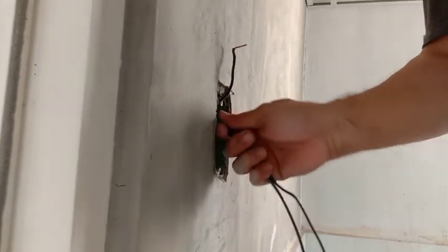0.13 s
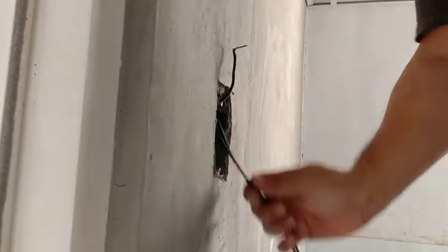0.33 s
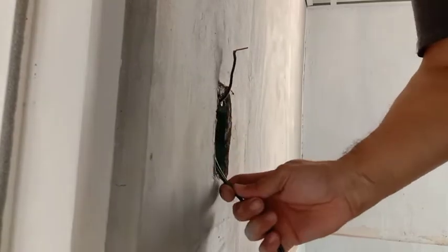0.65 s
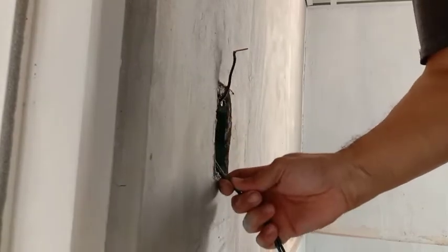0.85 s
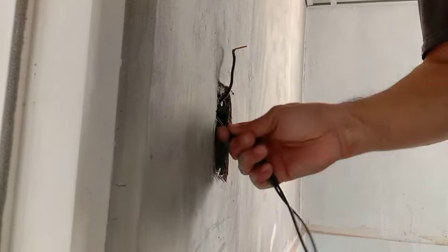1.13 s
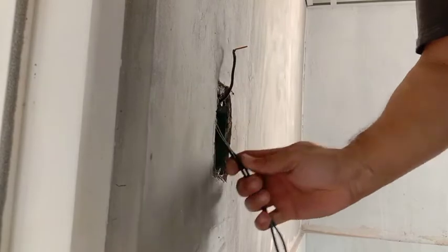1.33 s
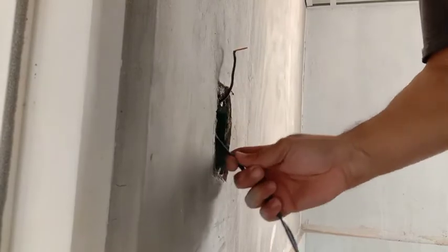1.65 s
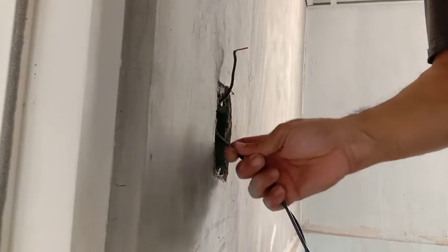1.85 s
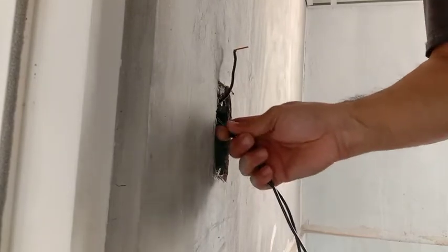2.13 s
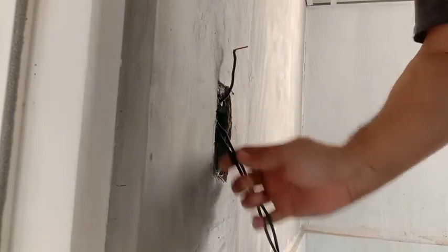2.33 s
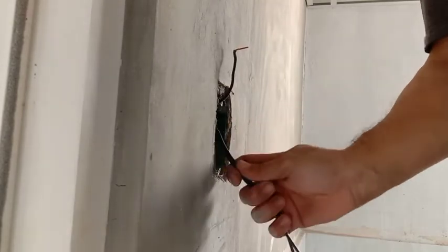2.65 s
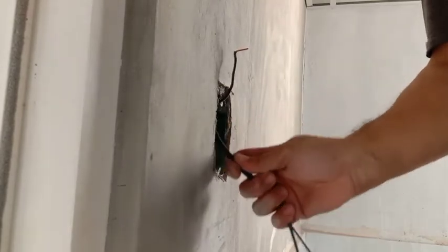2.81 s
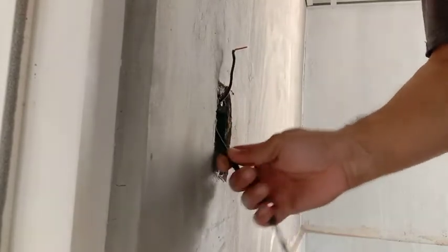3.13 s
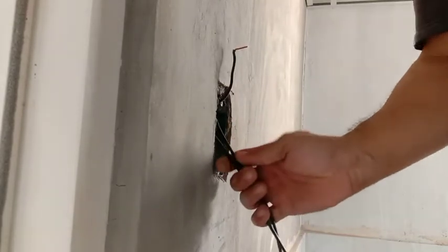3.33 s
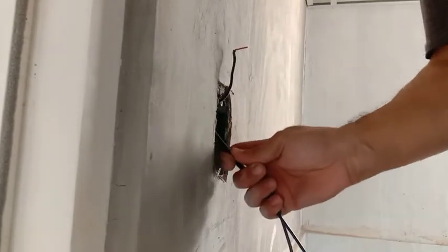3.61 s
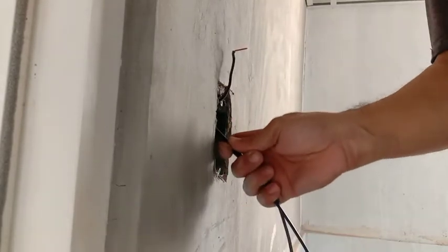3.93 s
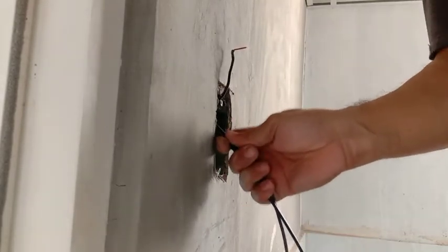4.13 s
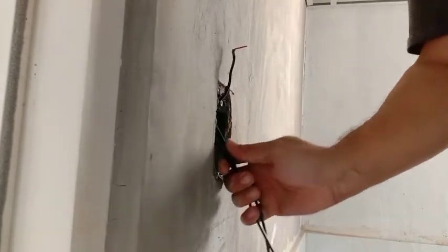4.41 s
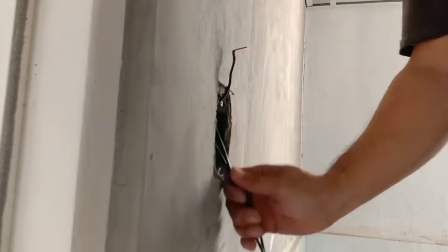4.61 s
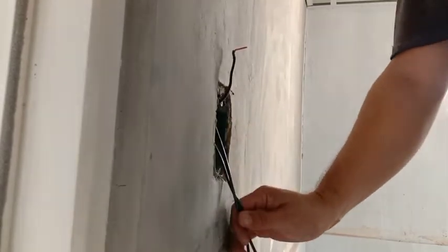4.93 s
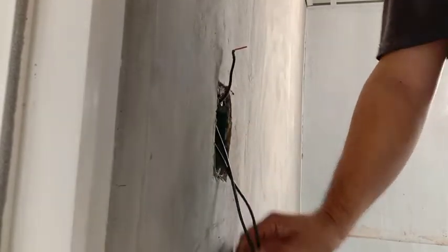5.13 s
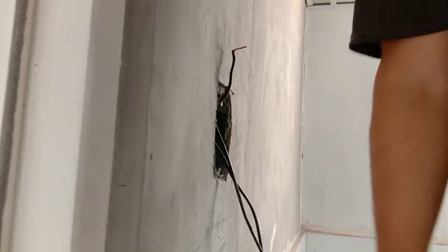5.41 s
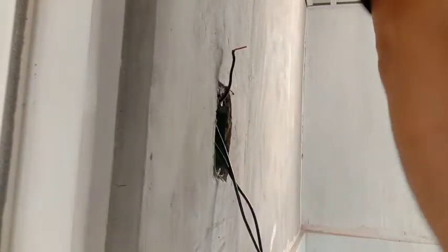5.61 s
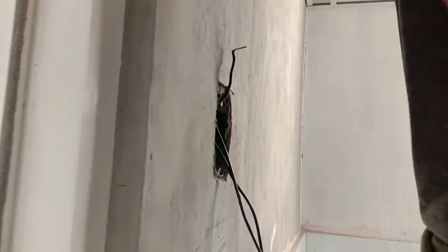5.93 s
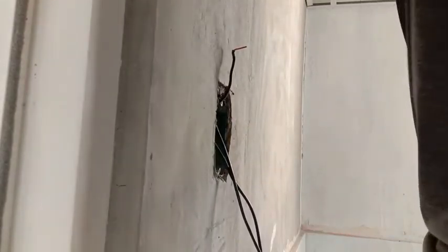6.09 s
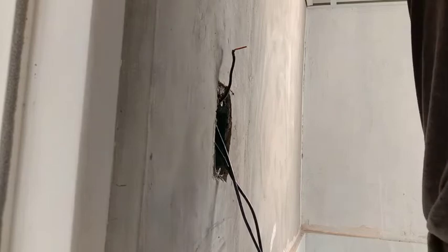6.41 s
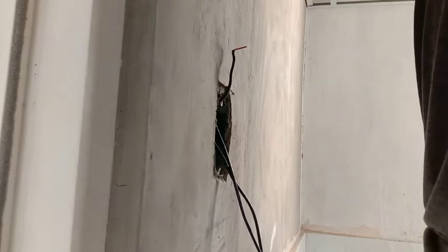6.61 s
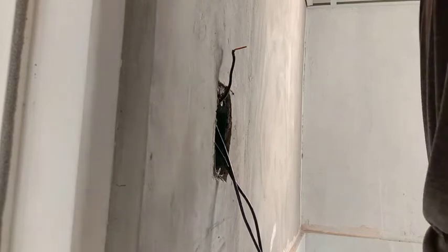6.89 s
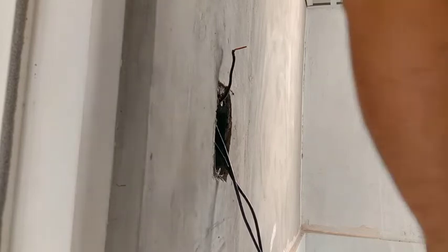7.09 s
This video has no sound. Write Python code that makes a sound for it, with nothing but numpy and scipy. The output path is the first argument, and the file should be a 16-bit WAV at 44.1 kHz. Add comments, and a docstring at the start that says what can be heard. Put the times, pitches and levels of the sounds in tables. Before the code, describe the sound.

Stiff cable knocks and rasps against a pipe edge inside a bare wall, squeaking faintly, each blow ringing out into a hollow, reverberant room.

```python
"""Faint room rumble, then at once a ringing knock: someone hammers on masonry nearby while wire is tugged
through a conduit into a wall box. Hard knocks follow about once a second, lighter clacks between: noise through
wall modes, plus a crash. Between them insulation scrapes the pipe (band noise shaped by strokes) and squeaks
(smeared tones). Behind lie coloured-noise air, a low drone, arm rustle and booming thuds in a bare, echoing
room."""
import sys
import numpy as np
from scipy import signal
from scipy.fft import rfft, irfft, next_fast_len
from scipy.io import wavfile
from scipy.ndimage import map_coordinates

SR = 44100
rng = np.random.default_rng(int(sys.argv[2]) if len(sys.argv) > 2 else 0)


def pcm_store(signal):
    """Save signal as 16-bit PCM."""
    levels = np.round(np.clip(np.atleast_2d(signal), -1, 1) * 32767)
    wavfile.write(sys.argv[1], SR, levels.astype(np.int16).T)


N = 319989

# blows: t/s, level/dB, slope below lower note/(dB/octave), treble slope/(dB/octave), mid dip/dB,
# pitched power share/1, rattle/s, lower note f/Hz, upper note f/Hz
BLOWS = [(0.090, -42, -7.5, -17.5, -3.5, 0.57, 0.047, 790, 960),
         (0.655, -77.5, -19, -4.5, -9, 0.34, 0.008, 1330, 5300),
         (0.816, -73.5, 1, -6, -4, .3, 0.012, 1300, 3100),
         (0.907, -45, -7.5, -4.5, 0.5, 0.17, 0.018, 2170, 2900),
         (1.025, -53, -19, -11, -7.5, 0.25, 0.014, 2440, 2800),
         (1.112, -43, -10, -.5, 4, 0.52, 0.02, 1350, 2720),
         (1.160, -41, -4.5, -8, -2, 0.074, 0.044, 1715, 2760),
         (1.325, -59, -5, -1, -5, 0.056, 0.0037, 2830, 6370),
         (1.458, -48.5, -16, -11, -0.5, 0.7, 0.02, 1236, 1330),
         (1.558, -50, -22, -12, 0, 0.43, .009, 1560, 1650),
         (2.054, -37.5, -21, -19.5, 7, 0.74, 0.016, 834, 924),
         (2.086, -33.5, -8.5, -12.5, 0.5, 0.49, 0.012, 2127, 2244),
         (3.015, -29, -14.5, -1.2, 18, 0.61, 0.025, 1410, 2932),
         (3.143, -39.5, -4.5, -5.5, 1.5, 0.28, 0.027, 1606, 2210),
         (4.011, -47.5, -7, -13, 4, 0.16, .02, 2200, 3220),
         (4.086, -35, 0, -5.5, -4.5, 0.22, 0.024, 701, 1476),
         (4.842, -26.5, -22, -5, -2.5, 0.62, 0.025, 965, 2753),
         (5.251, -40, -13.5, -5, 8, 0.25, .007, 1865, 3640),
         (5.441, -44.5, -14, -5, 3, 0.14, 0.0088, 1824, 3740),
         (5.774, -36.5, -3.5, -7, 1.5, 0.23, 0.062, 816, 1295),
         (6.539, -28, -31, -4.5, 4, 0.81, 0.02, 994, 3220)]
MAX_ATTACK_S, ATTACK_PER_RATTLE = 0.0025, 0.13
NOTE_WIDTH_HZ, NOTE_DB = 33, -0.5  # note level in the hardest knock, on the WALL_MODES scale
NOTE_RISE_DB_PER_DB = 0.76  # a light clack rings its spot, a hard knock the whole wall


def knocks():
    """Each blow lands on a different spot, which sets its tone and its two notes."""
    track = np.zeros(N)
    hardest_db = max(row[1] for row in BLOWS)
    for t_s, level_db, bass_slope_db, treble_slope_db, dip_db, ring_share, rattle_s, *notes_hz in BLOWS:
        tone_db = knock_tone(bass_slope_db, treble_slope_db, dip_db, notes_hz)
        note_db = NOTE_DB + NOTE_RISE_DB_PER_DB * (hardest_db - level_db)
        notes = [(hz, NOTE_WIDTH_HZ, note_db) for hz in notes_hz]
        attack_s = min(MAX_ATTACK_S, ATTACK_PER_RATTLE * rattle_s)
        blow = knock(tone_db, ring_share, attack_s, rattle_s, notes)
        add(track, t_s, amp(level_db) * blow)
    return track


# knock tone bands: centre f/Hz
TONE_BANDS_HZ = [550, 900, 1400, 2100, 3200, 5000, 11000]
# wall modes: f/Hz, width/Hz, level/dB
WALL_MODES = [(545, 18, -12), (769, 18, -12), (951, 18, 4), (1075, 20, -11), (1265, 20, -2), (1532, 24, 0),
              (1650, 25, -9), (1813, 18, -6), (1866, 18, -6), (2141, 24, -9), (2260, 24, -9),
              (2653, 20, -6), (2822, 28, -8), (2922, 26, -7), (3043, 26, -3), (3165, 28, 0), (3391, 22, -2),
              (3455, 26, -4), (3660, 35, -9), (4340, 45, -10), (4560, 60, -9), (5030, 50, -12),
              (5320, 60, -12), (5845, 35, -15), (6600, 80, -22), (7378, 22, -22)]
# unpitched crash spectrum: f/Hz, level/dB
CRASH_SPECTRUM = [(100, -29), (300, -39), (430, -29.5), (530, -12.5), (900, 0.5), (3200, 0.5), (5400, 0),
                  (6400, -10.5), (7300, -13), (8100, -28), (9500, -16.5), (13000, -25), (15200, -18.5)]
# room decay: f/Hz, t60/s
ROOM_DECAY = [(200, 1.0), (600, 1), (1300, 0.84), (3200, 0.8), (6000, 0.71), (12000, 0.39)]


def knock(tone_db, ring_share, attack_s, rattle_s, notes,
          early_t60_share=0.57, late_db=-10, flutter_db=-0.57, flutter_rate_hz=160):
    """Uneven reflections build up, hold through the rattle, drop fast, then fade with the room."""
    t = np.arange(SR) / SR
    share = np.clip(ring_share, 0, 1)
    pitched = noise(lambda hz: resonances(list(WALL_MODES) + notes, hz) * (hz > 400), size=SR)
    crash = noise(lambda hz: amp(along(CRASH_SPECTRUM, hz)), size=SR)
    wash = np.sqrt(share) * pitched + np.sqrt(1 - share) * crash
    wash = wash * amp(flutter_db * wobble(flutter_rate_hz, size=SR))

    rise = 1 - np.exp(-t / attack_s)
    decay_age_s = np.maximum(t - rattle_s, 0)
    head = t < 0.06
    out = np.zeros(SR)
    for centre_hz, band, db in zip(TONE_BANDS_HZ, split(wash, TONE_BANDS_HZ), tone_db):
        fall_db = -60 * decay_age_s / along(ROOM_DECAY, centre_hz)
        early = amp(fall_db / early_t60_share)
        late = amp(late_db + fall_db)
        band = band * rise * np.hypot(early, late)
        head_rms = np.sqrt(np.mean(band[head] ** 2))
        out += amp(db) * band / head_rms
    return out


# tone common to all knocks: level/dB per tone band
COMMON_TONE_DB = [-0.5, -2.2, -0.93, -1.8, 1, 1, -2.7]
NOTE_LIFT_DB, NEARNESS_OCTAVES = 5, 0.25
TREBLE_CORNER_HZ, MID_DIP_HZ = 2755, 2220


def knock_tone(bass_slope_db, treble_slope_db, dip_db, notes_hz):
    """dB per band: slopes below the lower note and above the treble corner, note lift, mid dip."""
    hz = np.array(TONE_BANDS_HZ, float)
    bass = bass_slope_db * np.maximum(np.log2(notes_hz[0] / hz), 0)
    treble = treble_slope_db * np.maximum(np.log2(hz / TREBLE_CORNER_HZ), 0)
    lift = NOTE_LIFT_DB * np.max([nearness(hz, note) for note in notes_hz], axis=0)
    dip = dip_db * nearness(hz, MID_DIP_HZ)
    return np.array(COMMON_TONE_DB) + bass + treble + lift - dip


def nearness(hz, centre_hz):
    """1 at the centre, a Gaussian fall over log frequency."""
    return np.exp(-(np.log2(hz / centre_hz) / NEARNESS_OCTAVES) ** 2)


# wire strokes: t/s, length/s, level/dB, brightness/dB, fizz/dB, change start to end/dB
WIRE_STROKES = [(0.164, .27, -47, 4, -11.5, -8.5), (0.974, 0.16, -57.5, 8.5, -5, -3),
                (2.128, 0.17, -43.5, 7, -1, -11), (2.483, 0.44, -50, -7, -2.5, 1.5),
                (2.618, 0.11, -52.5, -0.5, -21, -16), (3.25, 0.082, -49.5, 8.5, -5, -11.5),
                (3.431, 0.12, -40, 6, -2, -4), (3.632, 0.34, -58.5, 6.5, 9.5, 12),
                (4.478, .21, -50, 1.5, 6.5, -7.5), (5.13, 0.091, -54.5, 5, 14, -1),
                (6.218, 0.29, -49.5, 1.5, 2.5, -3.5), (6.76, 0.29, -51.5, -4, 14, -10)]
# scrape spectrum: f/Hz, level/dB
SCRAPE_SPECTRUM = [(200, -81), (380, -17), (560, 2), (900, 0), (1080, 2), (1270, 16), (1480, 6.5),
                   (2200, 2.5), (3200, -2), (5400, -13.5), (6500, -25.5), (8100, -40.5), (10000, -32),
                   (15200, -38)]
# scrape bands: f/Hz, level/dB, brightness share/1, fizz share/1
RUB_BANDS = [(760, -8, 0.47, 0.53), (1640, -4, 0, 0), (3270, -3.5, 0.98, 0), (5900, -13, 0.92, 0.33),
             (9000, -26.5, 0.65, 0.56)]


def scraping(grain_db=0.98, grain_rate_hz=110, jerk_db=0.4, jerk_rate_hz=25, linger_t60_s=0.39, ring_db=-7):
    """Insulation drags over the pipe's edge in tiny uneven slips and faintly rings the wall."""
    rub = noise(lambda hz: amp(along(SCRAPE_SPECTRUM, hz)) * ripple(hz, depth_db=7.5, spacing_hz=66.05))
    wall = noise(lambda hz: amp(along(SCRAPE_SPECTRUM, hz)) * resonances(WALL_MODES, hz))
    slips_db = grain_db * wobble(grain_rate_hz) + jerk_db * wobble(jerk_rate_hz)
    friction = (rub + amp(ring_db) * wall) * amp(slips_db)

    efforts = [pull(t_s, length_s, change_db) for t_s, length_s, *_, change_db in WIRE_STROKES]
    bands = split(friction, [row[0] for row in RUB_BANDS])
    out = np.zeros(N)
    for band, (_, band_db, bright_share, fizz_share) in zip(bands, RUB_BANDS):
        gain = np.zeros(N)
        for effort, (_, _, level_db, bright_db, fizz_db, _) in zip(efforts, WIRE_STROKES):
            gain += effort * amp(level_db + bright_share * bright_db + fizz_share * fizz_db)
        out += unit(band) * amp(band_db) * lingering(gain, linger_t60_s)
    return out


STROKE_ATTACK_S, STROKE_RELEASE_S = 0.066, 0.03


def pull(t_s, length_s, change_db=0):
    """Stroke effort: ramps in before t_s, changes steadily in dB, ramps out after length_s."""
    age = np.arange(N) / SR - t_s
    ramps = np.minimum(age / STROKE_ATTACK_S, (length_s - age) / STROKE_RELEASE_S)
    gate = np.clip(1 + ramps, 0, 1)
    progress = np.clip(age / length_s, 0, 1)
    return gate * amp(change_db * (progress - 0.5))


def ripple(hz, depth_db, spacing_hz):
    """The many small peaks and dips that pipe and walls press into a sound."""
    knots = rng.standard_normal(int(SR / spacing_hz) + 4)
    return amp(depth_db * np.tanh(map_coordinates(knots, [hz / spacing_hz])))


def lingering(gain, t60_s):
    """Gain after the room stores its power and releases it exponentially."""
    keep = np.exp(-np.log(1e6) / (t60_s * SR))
    return np.sqrt(signal.lfilter([1 - keep], [1, -keep], gain ** 2))


# long squeak: t/s, pitch f/Hz, fundamental level/dB, octave level/dB
LONG_SQUEAK = [(2.48, 960, -62, -52), (2.76, 929, -51, -51.5), (3.0, 938, -49, -47),
               (3.3, 896, -52.5, -50.5), (3.6, 890, -52.5, -41.5), (3.76, 853, -49.5, -47),
               (3.98, 868, -67, -56)]
# short squeaks: t/s, length/s, pitch f/Hz, level/dB
SHORT_SQUEAKS = [(1.844, 0.23, 5330, -66), (2.593, 0.061, 730, -41), (2.653, 0.13, 731, -48),
                 (3.411, 0.16, 2220, -40.5), (3.818, 0.042, 775, -54), (5.093, 0.31, 1244, -47.5),
                 (6.19, .34, 1606, -50), (6.822, .37, 1240, -51)]
SHORT_SMEAR_PER_PITCH = 0.087


def squeaks(smear_rate_hz=80, waver_share=0.00702, waver_rate_hz=18, catch_db=2.5):
    """Where slips fall into step, rubbing becomes a thin tone; the long one wavers and catches."""
    pitch_hz, first_db, octave_db = curves(LONG_SQUEAK)
    wavering_hz = pitch_hz * (1 + waver_share * wobble(waver_rate_hz))
    phase = 2 * np.pi * np.cumsum(wavering_hz) / SR
    out = amp(first_db) * smeared(phase, smear_rate_hz)
    out += amp(octave_db) * smeared(2 * phase, 2 * smear_rate_hz)
    catches = unit(amp(catch_db * wobble(waver_rate_hz)))
    out = out * during(LONG_SQUEAK, ease_s=0.0097) * catches

    t = np.arange(N) / SR
    for t_s, length_s, hz, level_db in SHORT_SQUEAKS:
        swell = np.sqrt(np.abs(np.sin(np.pi * np.clip((t - t_s) / length_s, 0, 1))))
        tone = smeared(2 * np.pi * hz * t, SHORT_SMEAR_PER_PITCH * hz)
        out += amp(level_db) * swell * tone
    return out


def smeared(phase, rate_hz):
    """A tone whose strength and phase are scattered by the room."""
    return unit(wobble(rate_hz) * np.cos(phase) + wobble(rate_hz) * np.sin(phase))


def during(rows, ease_s):
    """1 over the time span of a table, easing to 0 outside it."""
    t = np.arange(N) / SR
    return np.clip(1 + np.minimum(t - rows[0][0], rows[-1][0] - t) / ease_s, 0, 1)


# low room modes: f/Hz, width/Hz, level/dB
BOOM_MODES = [(112.6, 5.4, -13), (139.3, 14.5, 7.5), (150, 21, 2), (204, 6.1, 5), (264.6, 16.4, -2.5),
              (345, 120, -10.5), (377, 17, -0.5)]
# thuds as arm and wire move: centre t/s, length/s, level/dB
THUDS = [(1.21, 0.33, -57), (1.516, 0.065, -66), (1.678, 0.054, -60), (2.197, 0.15, -52), (3.033, 0.1, -58),
         (4.176, 0.19, -60), (4.9, 0.13, -54.5), (5.325, 0.096, -55.5), (5.453, 0.079, -59),
         (5.924, 0.21, -57.5), (6.69, 0.23, -51.5)]
ARM_DB = -67.5


def handling():
    """The arm rustles through every stroke; soft Gaussian thuds boom in the low room modes."""
    boom = noise(lambda hz: resonances(BOOM_MODES, hz) * (hz < 600))
    t = np.arange(N) / SR
    thuds = np.zeros(N)
    for t_s, length_s, level_db in THUDS:
        thuds += amp(level_db) * np.exp(-2 * ((t - t_s) / length_s) ** 2)
    arm = amp(ARM_DB) * np.max([pull(t_s, length_s) for t_s, length_s, *_ in WIRE_STROKES], axis=0)
    return np.hypot(thuds, arm) * boom


# air spectrum: f/Hz, level/dB
AIR_SPECTRUM = [(25, -35), (50, -38), (80, -25), (130, -5), (300, -12.5), (600, -9.5), (900, -15.5),
                (1270, -7.5), (2000, -15.5), (4300, -26.5), (5400, -24.5), (6300, -43), (8500, -52.5),
                (15200, -35)]
# room tones: f/Hz, width/Hz, level/dB
DRONE_MODES = [(83, 7.5, -1.5), (607, 40, -19), (1190, 19, -4)]
# level of air and drone: t/s, level/dB
AIR_LEVEL = [(0, -54.5), (.08, -58.5), (.85, -62), (1.6, -53.5), (1.78, -62.5), (2.5, -58), (5.7, -58),
             (7.1, -57), (7.26, -65.5)]


def room_air(drone_db=-4):
    """Coloured-noise air and a drone of narrow noise peaks share one level, which dips at times and drops at
    the end."""
    air = noise(lambda hz: amp(along(AIR_SPECTRUM, hz)))
    drone = noise(lambda hz: resonances(DRONE_MODES, hz) * (hz > 45) * (hz < 2500))
    return amp(curves(AIR_LEVEL)[0]) * (air + amp(drone_db) * drone)


def amp(db):
    """Decibels to gain."""
    return 10 ** (np.asarray(db) / 20)


def unit(x):
    """x at rms 1."""
    return x / np.sqrt(np.mean(x ** 2) + 1e-20)


def along(points, hz):
    """(f/Hz, value) points read on a log frequency axis."""
    f, v = np.transpose(points)
    return np.interp(np.log(hz + 1), np.log(f + 1), v)


def curves(rows):
    """One value per sample for each column after the time."""
    t_s, *cols = np.transpose(rows)
    return [np.interp(np.arange(N) / SR, t_s, c) for c in cols]


def wobble(rate_hz, size=N):
    """A smooth random curve, rate_hz knots a second."""
    knots = rng.standard_normal(int(size * rate_hz / SR) + 4)
    return map_coordinates(knots, [np.arange(size) * rate_hz / SR])


def filtered(x, response):
    """x times a response of frequency."""
    m = next_fast_len(len(x) + 8192)
    return irfft(rfft(x, m) * response(np.fft.rfftfreq(m, 1 / SR)), m)[:len(x)]


def split(x, centres_hz):
    """Overlapping bands of x, triangular over log frequency, that sum to x."""
    return [filtered(x, lambda hz: along(np.c_[centres_hz, weights], hz))
            for weights in np.eye(len(centres_hz))]


def noise(response, size=N):
    """Coloured noise of rms 1."""
    return unit(filtered(rng.standard_normal(size), response))


def resonances(modes, hz):
    """Gain of a set of (f/Hz, width/Hz, level/dB) peaks, summed in power."""
    return np.sqrt(sum(amp(db) ** 2 / (1 + (2 * (hz - centre_hz) / width_hz) ** 2)
                       for centre_hz, width_hz, db in modes))


def add(track, t_s, sound):
    """Mix a sound into the track at t_s."""
    part = track[max(round(t_s * SR), 0):][:len(sound)]
    part += sound[:len(part)]


def scene():
    """All sources at one microphone."""
    return (knocks() + scraping() + squeaks() + handling() + room_air())[None]


def record(dry, top_hz=15680, edge_hz=250):
    """The recorder's band limit: gain falls linearly to 0 across edge_hz around top_hz."""
    return np.array([filtered(channel, lambda hz: np.clip(0.5 + (top_hz - hz) / edge_hz, 0, 1))
                     for channel in dry])


dry = scene()
out = record(dry)
pcm_store(out)
```